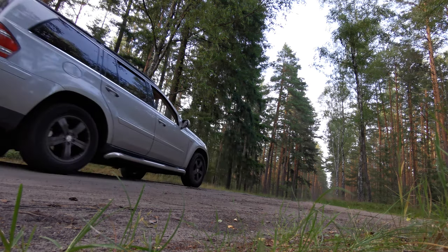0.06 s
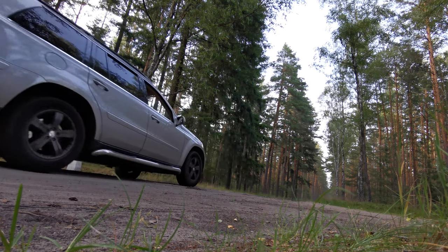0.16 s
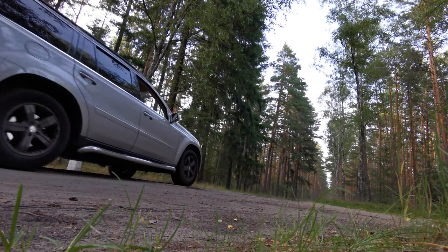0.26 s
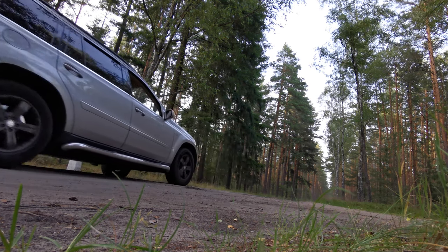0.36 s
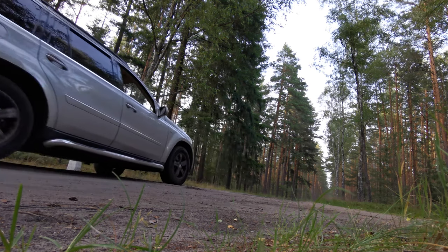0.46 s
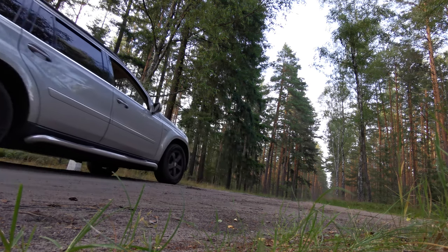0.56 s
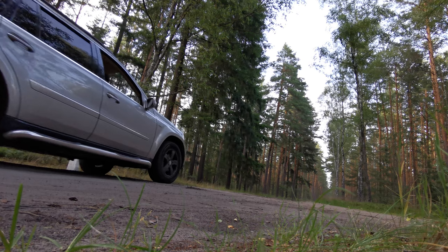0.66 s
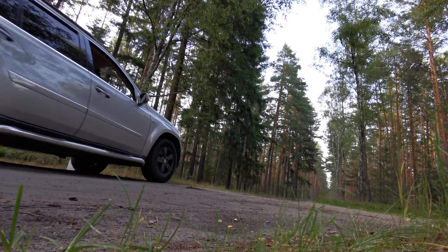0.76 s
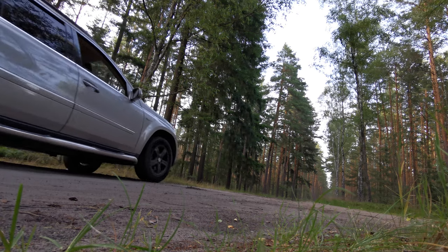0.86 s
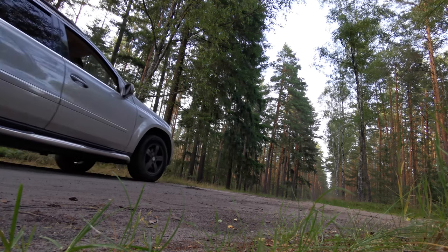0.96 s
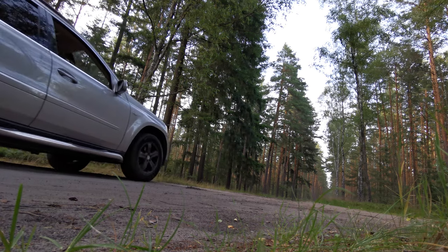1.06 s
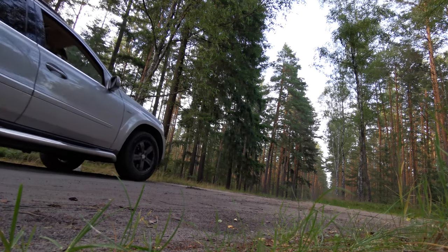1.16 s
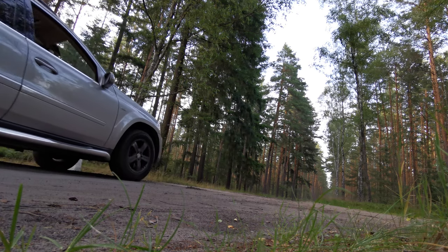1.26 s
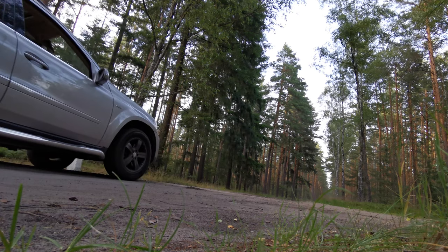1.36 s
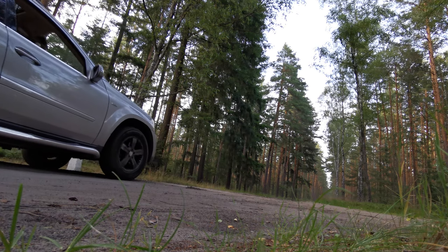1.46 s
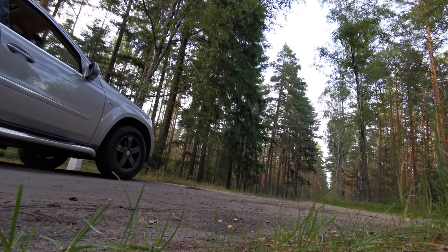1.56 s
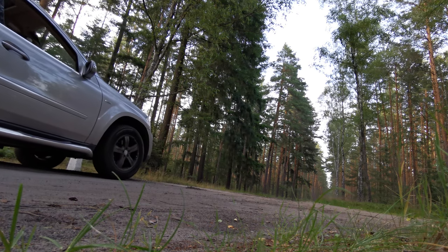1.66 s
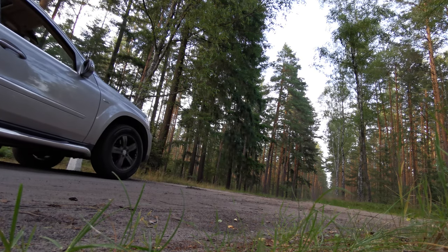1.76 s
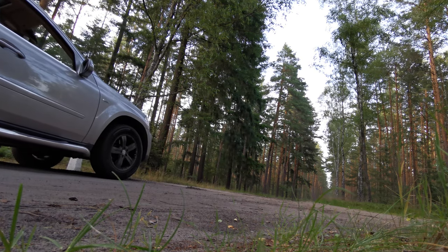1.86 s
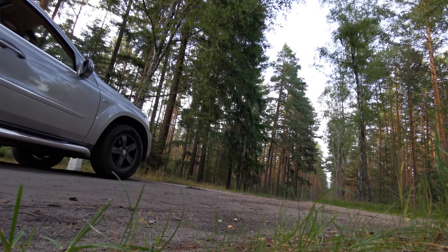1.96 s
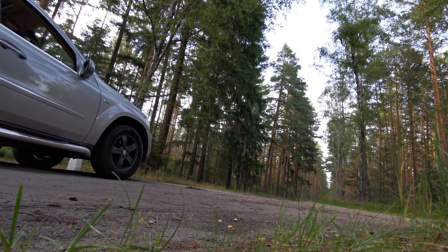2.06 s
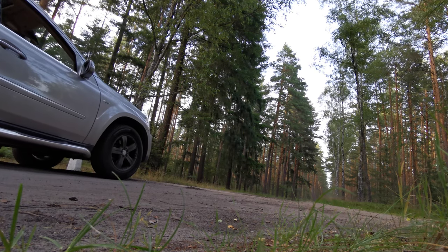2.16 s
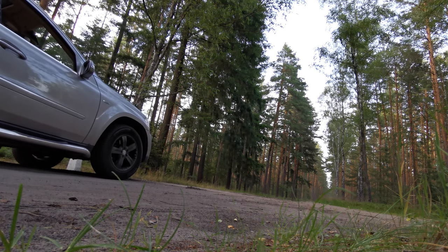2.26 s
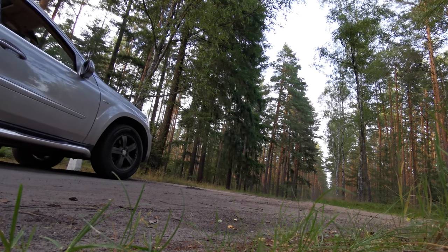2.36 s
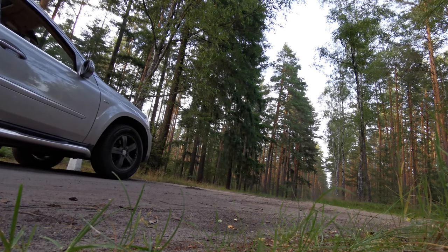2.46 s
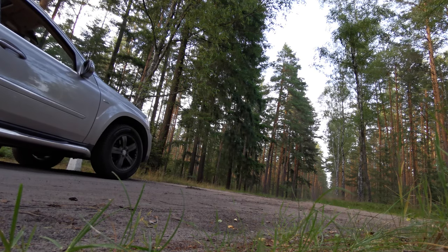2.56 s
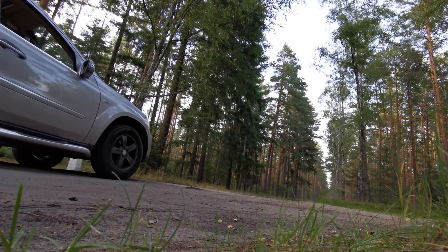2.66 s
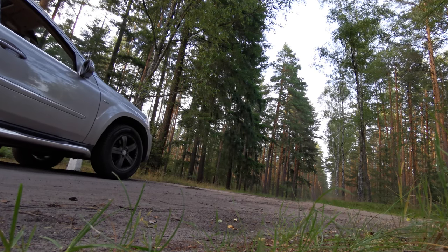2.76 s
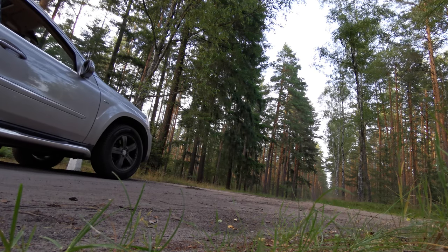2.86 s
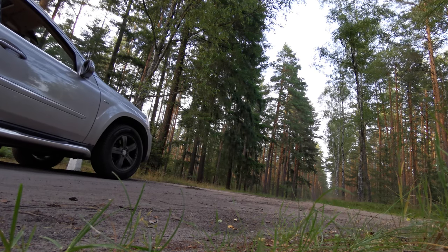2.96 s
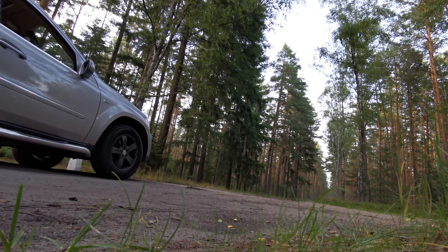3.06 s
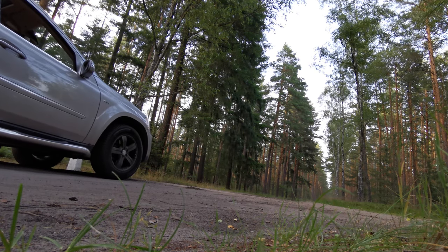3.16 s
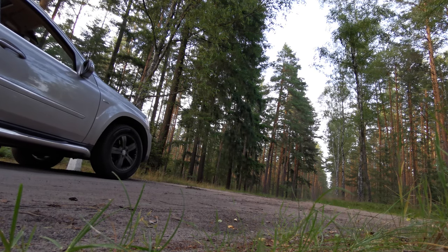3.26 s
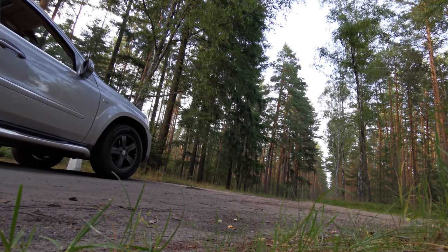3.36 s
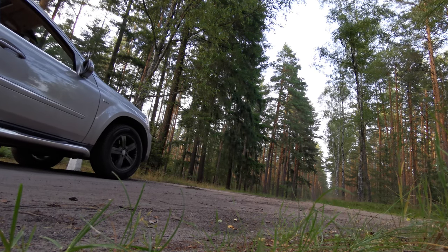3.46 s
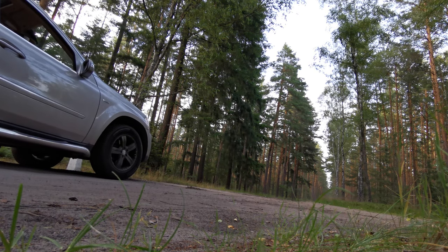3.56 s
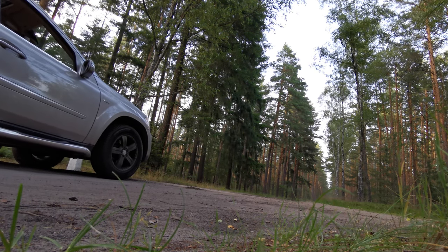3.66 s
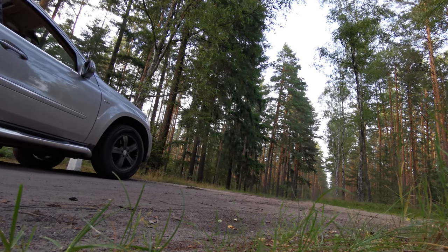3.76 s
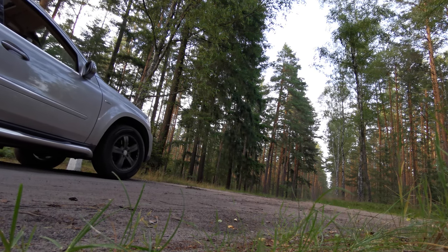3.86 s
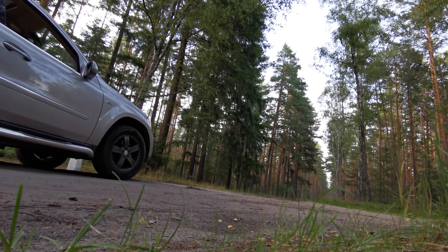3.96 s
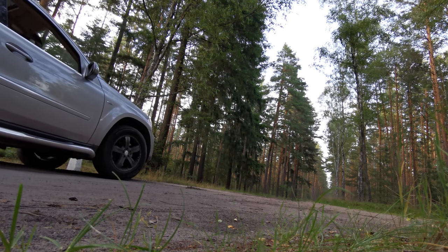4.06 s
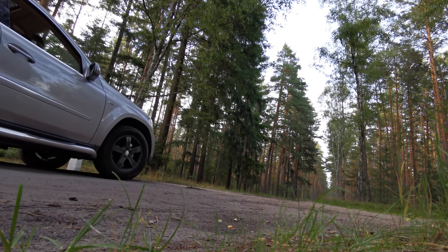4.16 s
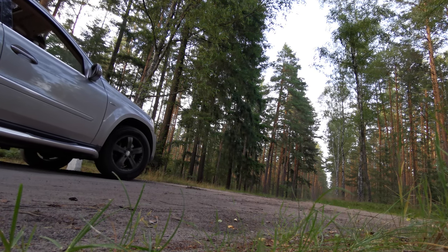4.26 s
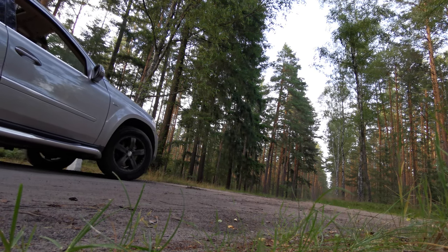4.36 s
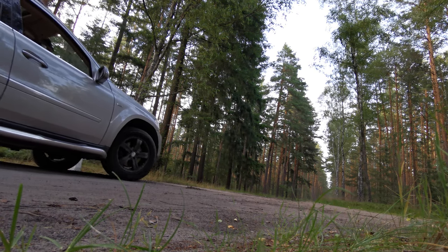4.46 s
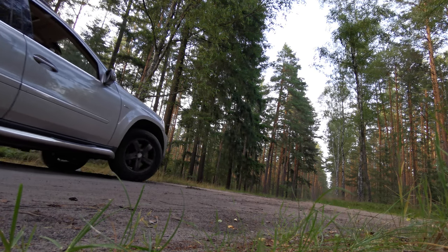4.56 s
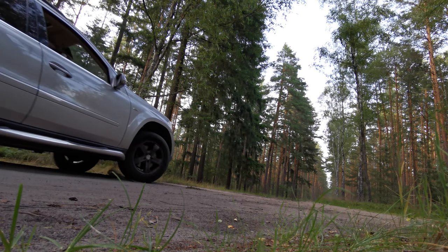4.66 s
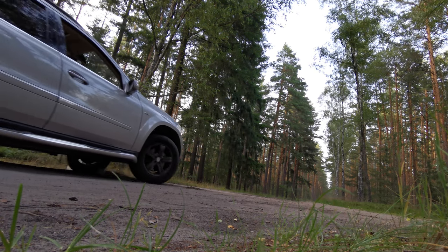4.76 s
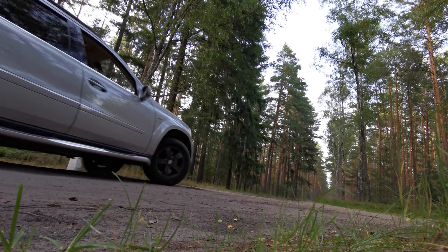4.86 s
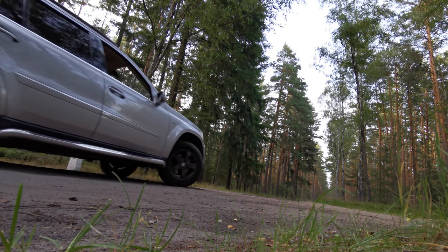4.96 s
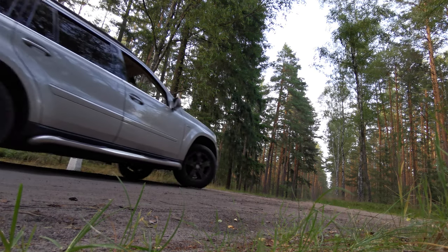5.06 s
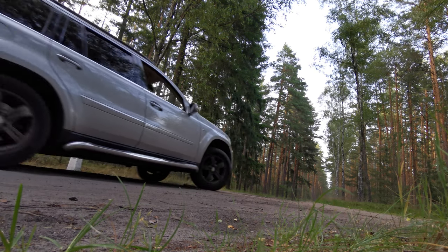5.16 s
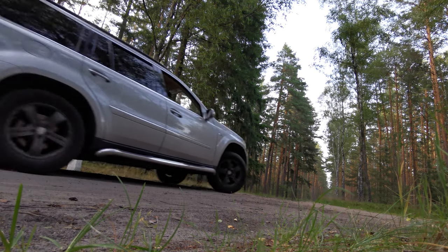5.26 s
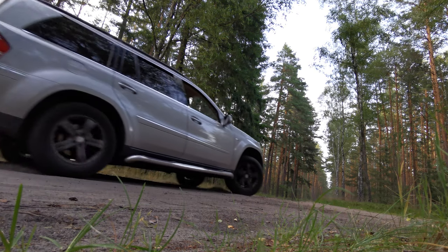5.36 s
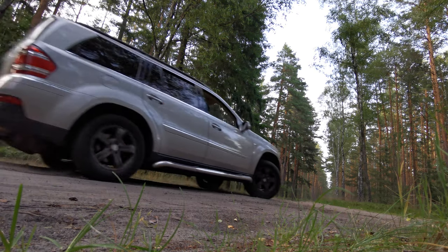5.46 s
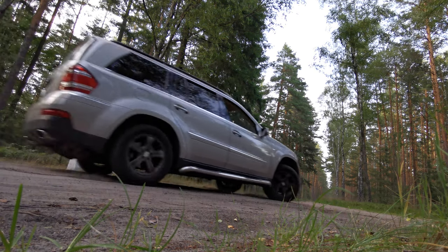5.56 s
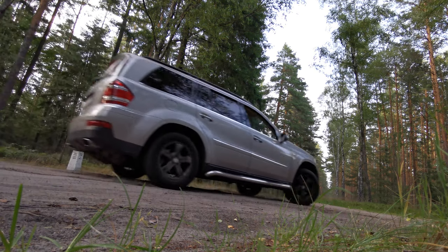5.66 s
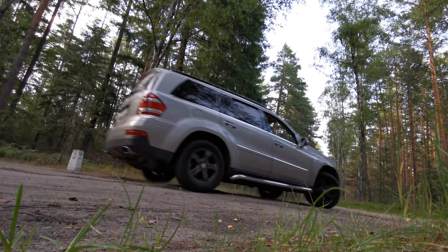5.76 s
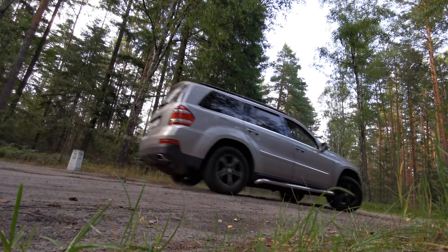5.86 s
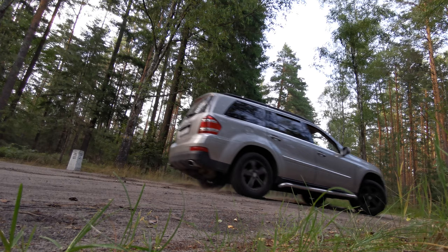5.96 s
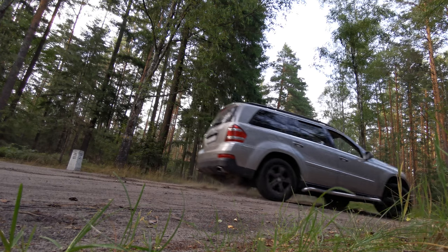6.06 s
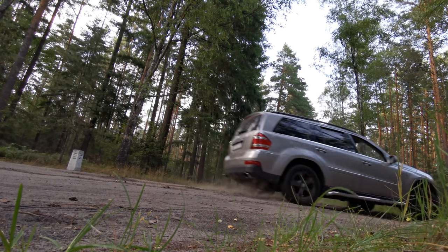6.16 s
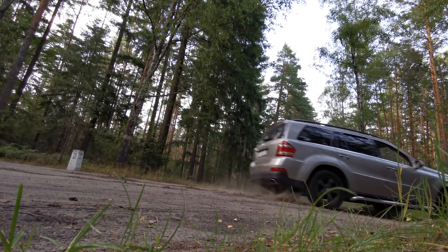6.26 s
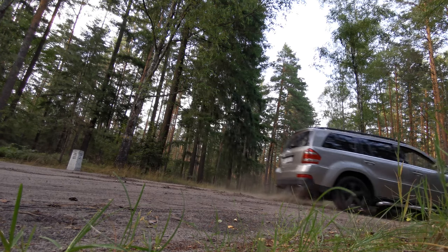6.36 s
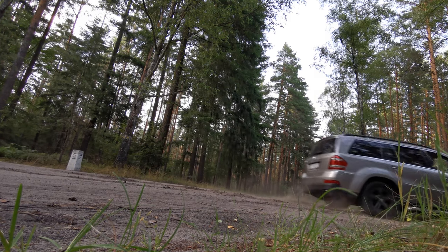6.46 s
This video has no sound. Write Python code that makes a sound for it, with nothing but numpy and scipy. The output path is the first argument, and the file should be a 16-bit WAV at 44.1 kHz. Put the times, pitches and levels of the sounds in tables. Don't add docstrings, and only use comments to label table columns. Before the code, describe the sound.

On a quiet forest road, a heavy eight-cylinder SUV backs up with its engine sinking towards idle and tyres softly rolling. A very high brake squeak stops it, gear knocks and rattles follow, and it burbles unevenly with a faint whine. Then the throttle slams open: the exhaust roars upward, gas hisses and gravel snaps as it launches past a stereo microphone near the ground.

```python
import sys
import numpy as np
from scipy import signal
from scipy.fft import rfft, irfft, next_fast_len
from scipy.io import wavfile
from scipy.ndimage import uniform_filter1d, map_coordinates

SR = 44100
rng = np.random.default_rng(int(sys.argv[2]) if len(sys.argv) > 2 else 0)


def to_wav(s):
    ch = np.atleast_2d(s).T
    pcm = np.round(np.clip(ch, -1, 1) * 32767)
    wavfile.write(sys.argv[1], SR, pcm.astype(np.int16))


def magnitude_from_level(level_db):
    exponent = np.asarray(level_db, float) / 20
    return 10 ** exponent


N = 286657
SLOW = 16
WHINE_ORDER = 285.0

# time in seconds, speed in cycles per second.
ENGINE_SPEED = [(0, 6.3), (.2, 5.87), (.4, 5.45), (.6, 5.1), (1.0, 4.71), (1.3, 4.4), (1.6, 4.08),
                (1.9, 4.3), (2.2, 4.52), (2.6, 4.78), (2.8, 4.9), (3.0, 4.99), (3.3, 5.06), (3.7, 4.92),
                (4.0, 4.62), (4.18, 4.55), (4.3, 6.0), (4.37, 7.6), (4.45, 9.5), (4.54, 11.8),
                (4.63, 14.55), (4.72, 15.8), (4.8, 16.45), (4.88, 17.0), (4.95, 17.3), (5.19, 17.3),
                (5.27, 17.6), (5.5, 18.95), (5.69, 20.1), (5.8, 21.0), (5.95, 22.65), (6.08, 24.85),
                (6.21, 27.1), (6.31, 29.0), (6.5, 33.1)]
# time in seconds, throttle from 0 to 1, left port lead in ms.
DRIVE = [
    (0, 0.04, 0.45),
    (2.2, 0.02, 0.49),
    (2.6, 0.03, 0.52),
    (4.2, 0.06, 0.47),
    (4.45, 0.98, 0.53),
    (5.2, 1, 0.45),
    (5.7, 0.97, 0.24),
    (6.1, 0.97, 0.081),
    (6.5, 0.96, -0.17),
]
# time in seconds, exhaust tones in dB, rasp and rolling in dB, jet hiss in dB.
LEVELS = [(0.0, -37, -46, -73), (0.09, -29, -49.5, -72.5), (0.31, -39, -46.5, -72.5),
          (1.07, -42, -48.5, -66.5), (1.27, -39, -50, -65.5), (1.68, -42.5, -52, -67.5),
          (1.99, -40.5, -50.5, -66), (2.06, -35, -50.5, -68.5), (2.26, -35, -45, -61),
          (2.43, -37.5, -49.5, -67), (2.5, -33.5, -51, -67.5), (2.62, -38, -49.5, -67),
          (2.9, -31, -48.5, -65), (3.22, -33.5, -50, -65.5), (3.56, -35.5, -50, -65),
          (3.93, -43, -50.5, -67.5), (4.22, -37, -49.5, -67.5), (4.34, -20, -50.5, -64),
          (4.42, -18.5, -44, -60), (4.51, -16, -37, -49.5), (4.6, -15.5, -32.5, -48.5),
          (4.67, -13.5, -29.5, -46.5), (4.78, -11.5, -27.5, -47), (4.96, -12, -29.5, -47),
          (5.72, -14.5, -28, -49.5), (5.9, -13.5, -29, -48.5), (6.12, -15, -30, -49.5),
          (6.21, -14, -30.5, -51.5), (6.5, -13, -26.5, -49.5)]
# time in seconds, boom in dB, brightness in dB per octave.
TAIL_PIPE_VIEW = [(0, -3, 0), (.5, -4.5, -1), (1, -5.5, 0), (1.5, -4.5, 0), (2, -1, 0.5), (2.5, -1.5, 1),
                  (3, -2, 2.5), (3.5, 4, 1.5), (4, -6.5, 2.5), (4.3, 9.5, -1.5), (4.6, -0.5, -1.5),
                  (5, -3.5, 0), (5.4, 3.5, 1), (5.8, -2.5, 0.5), (6.1, 2, 1), (6.5, 6, 2.5)]
# level in dB of cycle order 1, 2, 3 and on.
IDLE_ORDERS_DB = [0, 0, -3, 1, -8, 1, -7, 10, -11, 2, -10, -3, -3, 5, -6, 3, -3, 9, -4, 4, -3, 6, -6, 1, -3,
                  10, -7, -1]
# level in dB of cycle order 1, 2, 3 and on.
LOAD_ORDERS_DB = [-4, -1, 2, -6, -7, 9, -6, 11, -1, 6, 3, 3, 2, 6, -2, -1, 2, -2, -1, -3, 1, 3, 3, -4, 3, 2,
                  -1, -4]
# frequency in Hz, gain in dB.
IDLE_PIPE = [(14, -30), (20, -16), (32, -8), (45, -1), (62, -3), (85, -6), (110, -4), (132, 0), (155, -11),
             (190, -16), (230, -15), (290, -18), (360, -30)]
# frequency in Hz, gain in dB.
LOAD_PIPE = [(18, -27), (35, -6), (55, -3), (80, -9), (105, -8), (135, 0), (170, -10), (215, -4),
             (270, -12), (410, -11), (500, -18), (620, -13), (800, -21), (1200, -36)]
# frequency in Hz, density in dB per Hz.
ROLLING = [(88, -32.5), (150, -20), (188, -29.5), (232, -19), (403, -5), (648, -5), (1010, -5.5),
           (1630, -24), (3500, -35.5), (4550, -75), (7700, -120)]
# frequency in Hz, density in dB per Hz.
RASP = [(150, -40), (300, -18), (450, -12), (670, -6), (800, -10), (1000, -15), (1700, -23), (2400, -32),
        (3500, -46), (5000, -80)]
# frequency in Hz, density in dB per Hz.
IDLE_HISS = [(1760, -29), (3000, -11.5), (3400, -27), (3570, -6), (3850, -11.5), (5120, -6.5), (6130, -11),
             (6900, -2.5), (7550, -8), (9040, -3), (10100, -10), (13700, -16.5), (15800, -20)]
# frequency in Hz, density in dB per Hz.
LOAD_HISS = [(1760, -18), (3000, -21), (3820, -9), (4940, -4.5), (7650, -3), (8550, 1.5), (9960, -3),
             (15100, -10), (15800, -30.5)]
# time in seconds, level in dB.
WHINE = [(.6, -75), (.75, -63), (1.25, -63), (1.4, -75), (2.28, -80), (2.35, -58), (2.8, -58), (3.3, -60),
         (3.8, -58), (4.15, -59), (4.3, -72), (4.4, -120)]
# time in seconds, pitch in Hz, level in dB.
SQUEAK = [
    (1.26, 10200, -94),
    (1.294, 10234, -77),
    (1.362, 10238, -43),
    (1.372, 10200, -52),
    (1.4, 10170, -41),
    (1.442, 10220, -44),
    (1.464, 10199, -37.5),
    (1.6, 10196, -95),
]
# time in seconds, peak in dB, ring in Hz, rattle in dB re peak.
CLUNKS = [(0.375, -43, 506, -26), (2.016, -30.5, 1100, -19.5), (2.033, -37, 514, -17.5),
          (2.164, -42.5, 610, -10), (2.205, -26, 643, -14.5), (2.23, -28.5, 640, -27),
          (2.298, -38, 630, -3.5), (2.314, -27, 764, -13), (2.328, -32, 663, -24), (2.359, -26.5, 622, -34),
          (2.454, -58.5, 435, -20.5), (2.799, -37, 483, -17.5), (3.639, -32, 527, -28),
          (3.66, -36, 455, -25), (4.428, -29.5, 720, -11.5)]
# frequency in Hz, level in dB, 60 dB decay time in seconds.
CASING = [(1100, -7, 0.14), (1300, -15, 0.051), (1454, -24, 0.021), (1897, -24.5, 0.044)]
# time in seconds, snaps per second on each path, level in dB.
GRAVEL = [
    (0, 11, -63),
    (1.5, 9.1, -61),
    (2, 3.25, -76),
    (4.4, 5, -55),
    (4.7, 40.3, -44.5),
    (5.9, 50, -43),
    (6.05, 190, -46),
    (6.5, 200, -37.5),
]
# frequency in Hz, left minus right in dB.
PORT_COLOUR = [(60, 4.0), (110, 4.5), (200, 4.5), (380, 1.5), (700, -1.0), (1290, 1.5), (2380, 0.0),
               (4400, 2.0), (8120, 6.0), (15000, 0.5)]
# frequency in Hz, power share heard by both.
LIKENESS = [(100, .99), (600, .97), (1200, .85), (2200, .45), (5000, .3), (9000, .4), (15000, .2)]


def in_time(rows, step=1):
    s, *columns = np.transpose(rows)
    now = np.arange(0, N, step) / SR
    return [np.interp(now, s, column) for column in columns]


def at_hz(points, hz):
    table_hz, value = np.array(points).T
    return np.interp(np.log(hz + 1), np.log(table_hz), value)


def rms_one(x):
    return x / np.sqrt(np.mean(x ** 2) + 1e-20)


def drift(rate, count, step=1):
    knots = rng.standard_normal((count, 1400))
    where = np.arange(0, N, step) / SR * np.clip(rate, .1, 200)
    rows = [np.interp(where, np.arange(1400), k) for k in knots]
    return np.array(rows) * np.sqrt(1.5)


def coloured(x, points):
    size = next_fast_len(N + 4096)
    gain = magnitude_from_level(at_hz(points, np.fft.rfftfreq(size, 1 / SR)))
    return irfft(rfft(x, size) * gain, size)[..., :N]


def ring(clicks, hz, t60):
    r, w = magnitude_from_level(-60 / (t60 * SR)), 2 * np.pi * hz / SR
    return signal.lfilter([0, np.sin(w)], [1, -2 * r * np.cos(w), r * r], clicks + 1e-18)


def tone(hz, db, shake_hz, shake_db):
    shake = drift(40.38, count=2)
    level = np.sqrt(2) * magnitude_from_level(db + shake_db * shake[0])
    return level * np.sin(2 * np.pi * np.cumsum(hz + shake_hz * shake[1]) / SR)


def exhaust(idle_wander_db, load_wander_db, spread):
    cycle_hz, = in_time(ENGINE_SPEED, SLOW)
    throttle = np.clip(in_time(DRIVE, SLOW)[0], 0, 1)
    boom_db, bright_db = in_time(TAIL_PIPE_VIEW, SLOW)
    order = np.arange(1, 73)[:, None]
    hz = order * cycle_hz

    idle_db = np.pad(IDLE_ORDERS_DB, (0, 44))[:, None] + at_hz(IDLE_PIPE, hz)
    idle_db = idle_db + idle_wander_db * drift(5.05, count=72, step=SLOW)
    load_db = np.pad(LOAD_ORDERS_DB, (0, 44))[:, None] + at_hz(LOAD_PIPE, hz)
    load_db = load_db + load_wander_db * drift(7.0, count=72, step=SLOW)
    boom_shape = np.exp(-(np.log2(hz / 125) / 0.38) ** 2)
    view_db = boom_db * boom_shape + bright_db * np.log2(hz / 150)
    gain = magnitude_from_level(idle_db * (1 - throttle) + load_db * throttle + view_db) * (hz < 1250)

    phase = spread * rng.standard_normal((72, 1)) + .2 * drift(2.0, count=72, step=SLOW)
    turn = 2 * np.pi * np.cumsum(cycle_hz) * SLOW / SR
    tones = np.sum(gain * np.cos(order * turn + phase), axis=0)
    power = np.sum(gain ** 2, axis=0) / 2
    tones /= np.sqrt(uniform_filter1d(power, size=300))
    return signal.resample_poly(tones, SLOW, 1)[:N]


def puffs(sharp, uneven_db):
    firings = 8 * np.cumsum(in_time(ENGINE_SPEED)[0]) / SR
    strength = magnitude_from_level(uneven_db * rng.standard_normal(900))[firings.astype(int)]
    return rms_one(strength * np.exp(sharp * np.cos(2 * np.pi * firings - np.pi)))


def flow_noise(idle, load, gate, flicker_db):
    throttle = np.clip(in_time(DRIVE)[0], 0, 1)
    white = rng.standard_normal((3, N)) * gate * magnitude_from_level(flicker_db * drift(21.0, count=3))
    idling = rms_one(coloured(white, idle)) * np.sqrt(1 - throttle)
    pulling = rms_one(coloured(white, load)) * np.sqrt(throttle)
    return idling + pulling


def rasp_and_rolling(db):
    return magnitude_from_level(db) * flow_noise(ROLLING, RASP, puffs(sharp=.45, uneven_db=2.5), flicker_db=1.5)


def jet_hiss(db):
    return magnitude_from_level(db) * flow_noise(IDLE_HISS, LOAD_HISS, puffs(sharp=0.1, uneven_db=0.0), flicker_db=0.6)


def pump_whine():
    hz = WHINE_ORDER * in_time(ENGINE_SPEED)[0]
    return tone(hz, *in_time(WHINE), shake_hz=7.0, shake_db=2.0)


def brake_squeak():
    hz, db = in_time(SQUEAK)
    sides = [magnitude_from_level(side_db) * tone(hz, db, shake_hz=3.1, shake_db=2.0) for side_db in (3.0, -1.5)]
    return np.array(sides)


def clunks():
    panels, shakes = np.zeros(N), np.zeros(N)
    push = np.zeros(6000)
    push[:40] = np.hanning(40) / 20
    for s, db, hz, rattle_db in CLUNKS:
        at = round(s * SR)
        thud = ring(push, hz, t60=.05)
        after_ring = .25 * ring(push, hz * 1.04, t60=.25)
        panels[at:at + 6000] += magnitude_from_level(db - 1.5) * (thud + after_ring)
        shakes[at] = magnitude_from_level(db + rattle_db)
    r = np.exp(-1 / (0.011 * SR))
    shaken = signal.lfilter([1], [1, -r], shakes)
    shaken = uniform_filter1d(shaken, size=200, origin=99) * rng.standard_normal((3, N))
    casing = sum(magnitude_from_level(db - 13) * ring(shaken[0], hz, t60) for hz, db, t60 in CASING)
    rattle = coloured(shaken, [(500, -7), (1500, 18.5), (3500, -5.5), (8800, -3), (15000, -20)])
    return panels + casing, rattle


def gravel():
    per_s, db = in_time(GRAVEL)
    size = magnitude_from_level(2.7 * np.minimum(rng.exponential(1, (3, N)), 4))
    born = (rng.random((3, N)) < per_s / SR) * size
    r = np.exp(-1 / (0.0019 * SR))
    snaps = signal.lfilter([1], [1, -r], born + 1e-18) * rng.standard_normal((3, N))
    return magnitude_from_level(db) * coloured(snaps, [(400, -14), (2500, -2), (5000, 3), (9000, -1), (15000, 1)])


def trees(x):
    dull = signal.sosfilt(signal.butter(1, 900, fs=SR, output="sos"), x)
    out = np.zeros((2, N))
    for k, lag_s in enumerate(rng.uniform(0.015, .16, 10)):
        lag = int(lag_s * SR)
        out[k % 2, lag:] += magnitude_from_level(-90 * lag_s) * dull[:N - lag]
    return out


def ports(direct, diffuse):
    size = next_fast_len(N)
    alike = np.clip(at_hz(LIKENESS, np.fft.rfftfreq(size, 1 / SR)), 0, 1)
    spectra = rfft(diffuse, size)
    left = direct + irfft(np.sqrt(alike) * spectra[0], size)[:N]
    own = irfft(np.sqrt(1 - alike) * spectra[1:], size)[:, :N]
    late = np.arange(N) - in_time(DRIVE)[1] * SR / 1000
    right = map_coordinates(left, [late], order=3, mode="nearest")
    return np.array([left, right]) + own


def scene():
    tones_db, rasp_db, hiss_db = in_time(LEVELS)
    pipe = magnitude_from_level(tones_db) * exhaust(idle_wander_db=2.0, load_wander_db=1.3, spread=1.5)
    knocks, rattle = clunks()
    direct = pipe + pump_whine() + knocks
    diffuse = rasp_and_rolling(rasp_db) + jet_hiss(hiss_db) + rattle + gravel()
    return ports(direct, diffuse) + brake_squeak() + magnitude_from_level(-23.5) * trees(direct)


def roll_off(x):
    return signal.sosfilt(signal.butter(12, 15900, fs=SR, output="sos"), x)


def record(dry):
    left = coloured(dry[0], [(hz, db / 2) for hz, db in PORT_COLOUR])
    right = coloured(dry[1], [(hz, -db / 2) for hz, db in PORT_COLOUR])
    mix = 1.316 * np.tanh(np.array([left, right]) / 1.256)
    return roll_off(mix)


dry = scene()
out = record(dry)
to_wav(out)
```